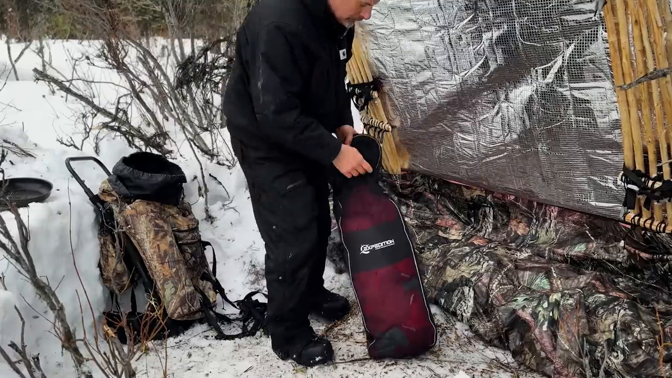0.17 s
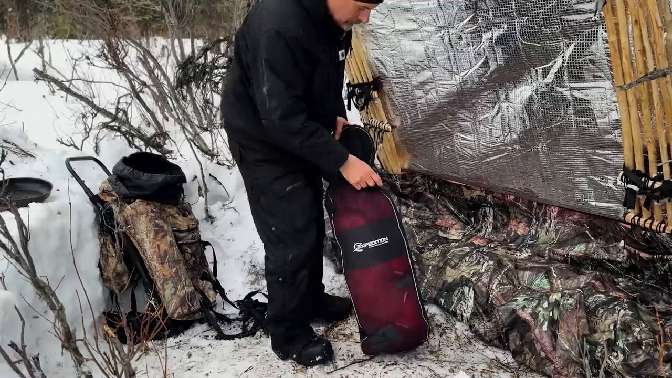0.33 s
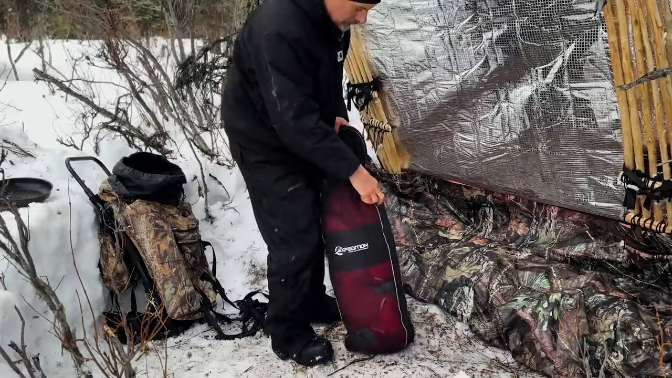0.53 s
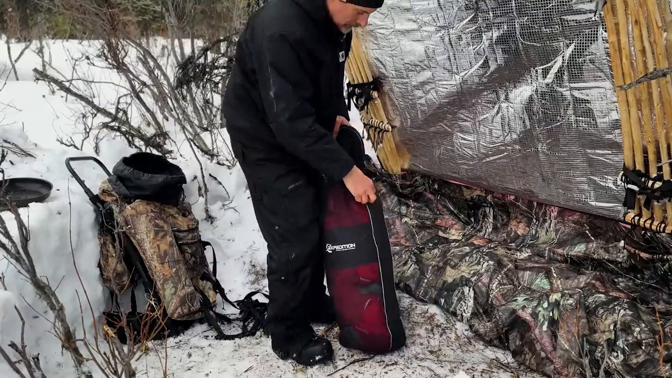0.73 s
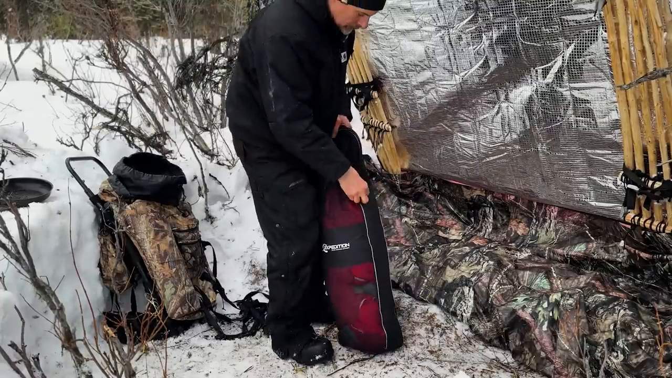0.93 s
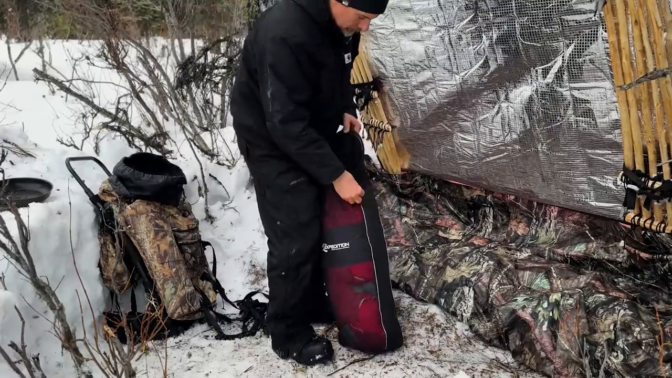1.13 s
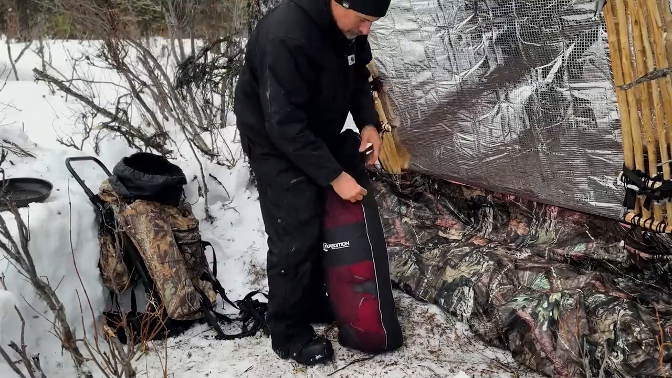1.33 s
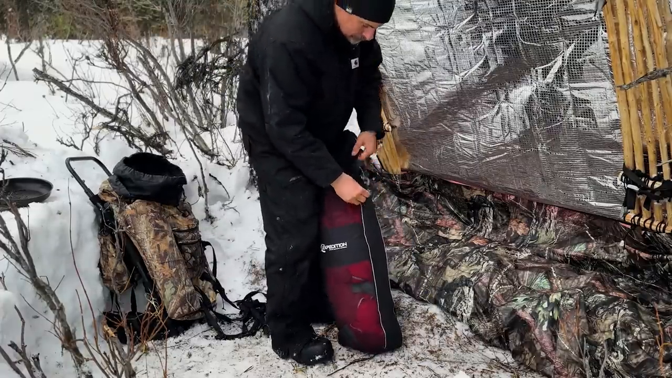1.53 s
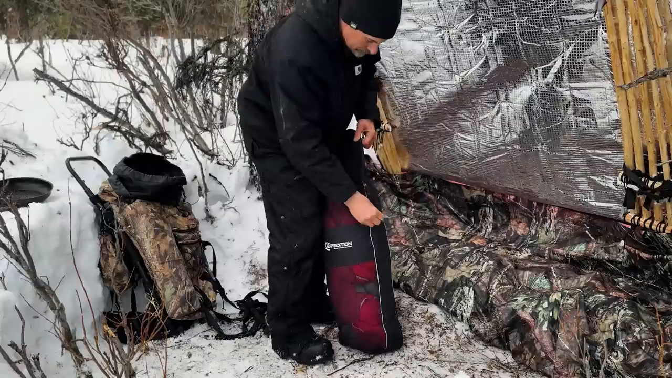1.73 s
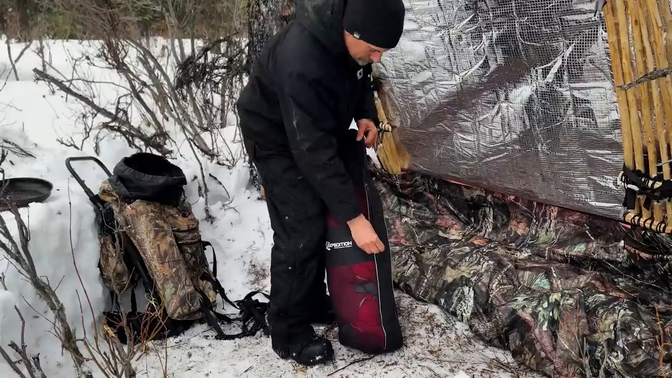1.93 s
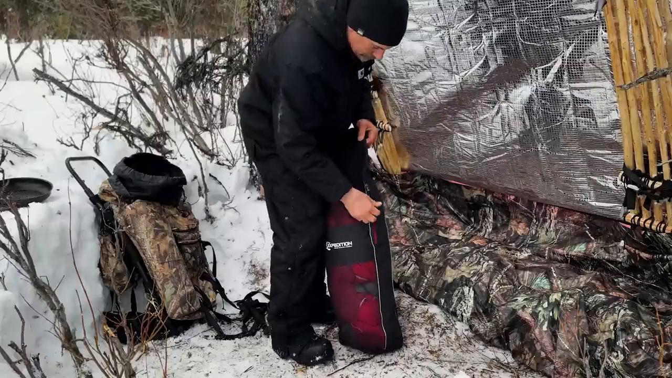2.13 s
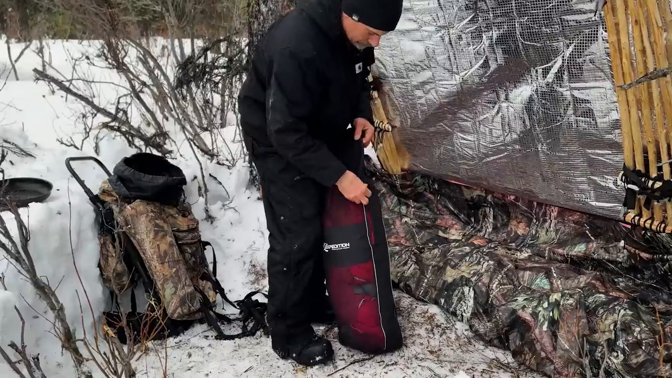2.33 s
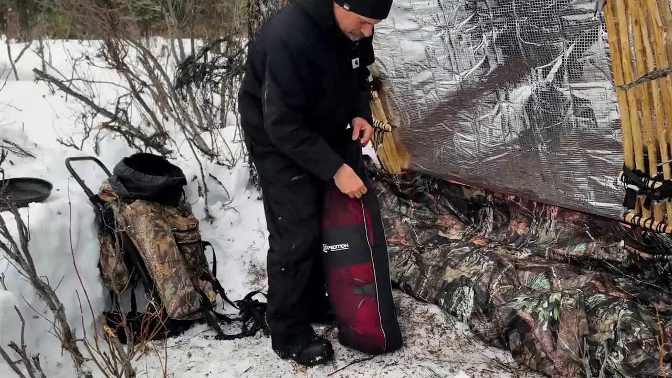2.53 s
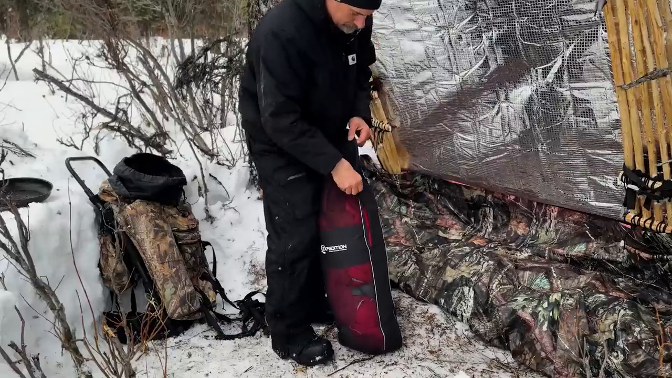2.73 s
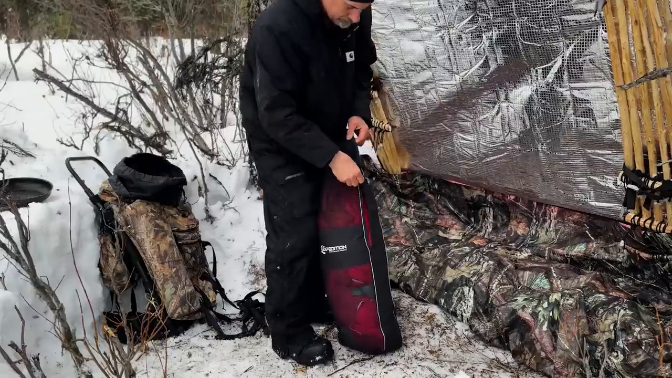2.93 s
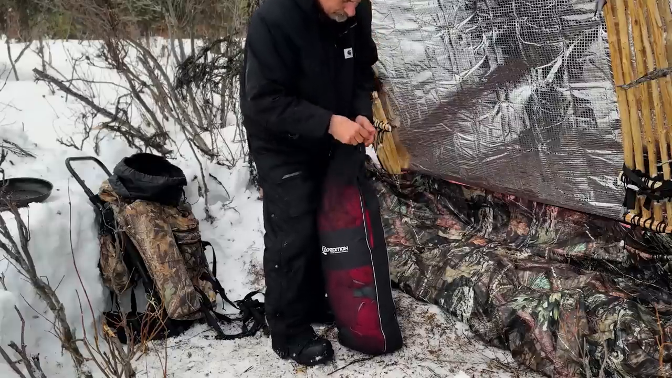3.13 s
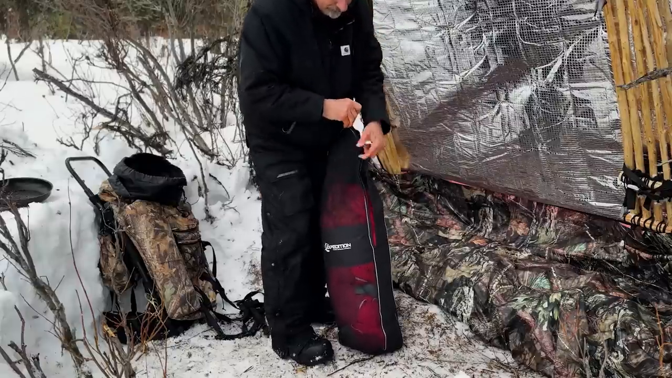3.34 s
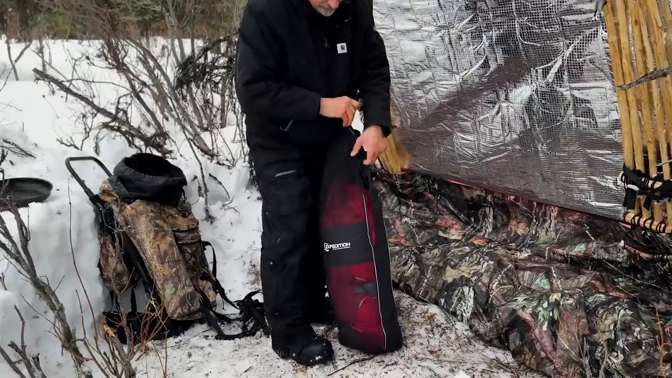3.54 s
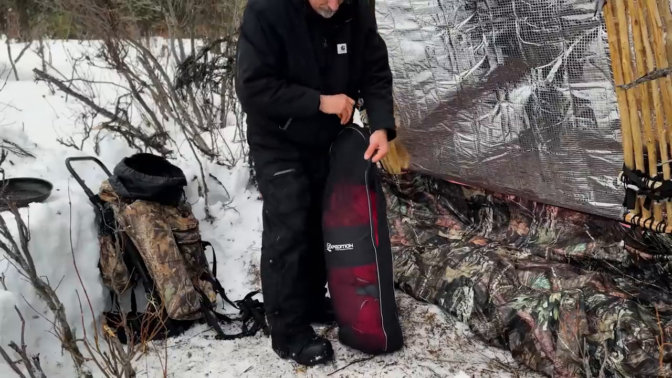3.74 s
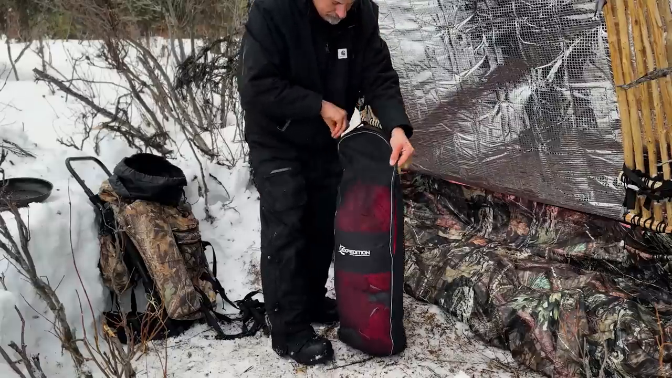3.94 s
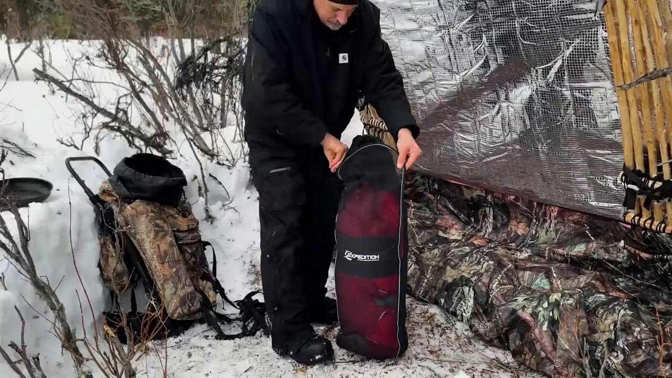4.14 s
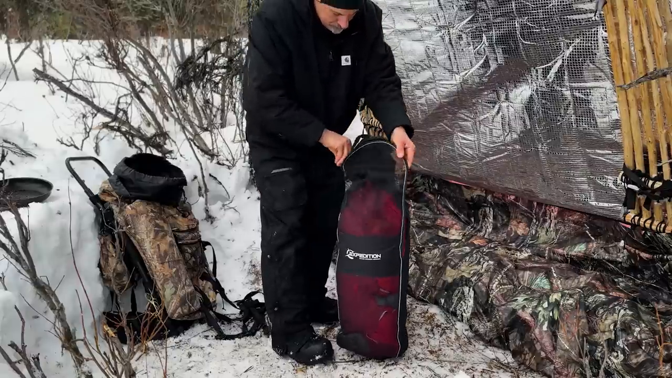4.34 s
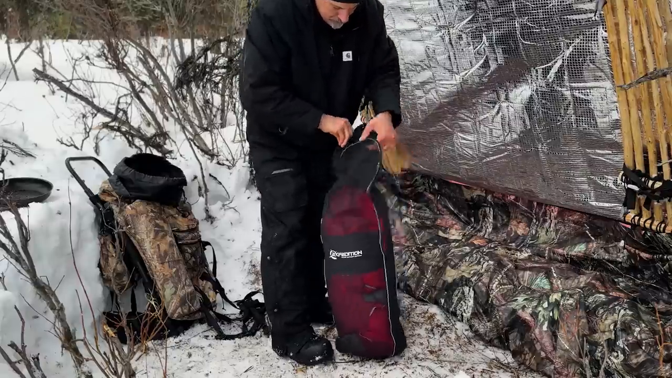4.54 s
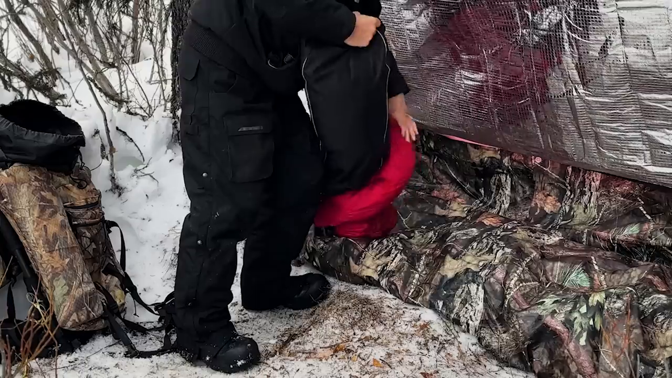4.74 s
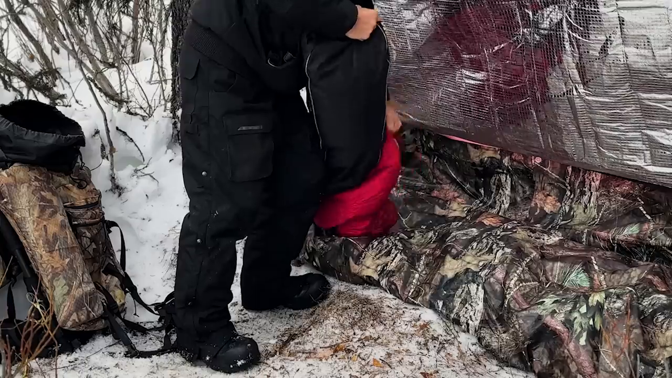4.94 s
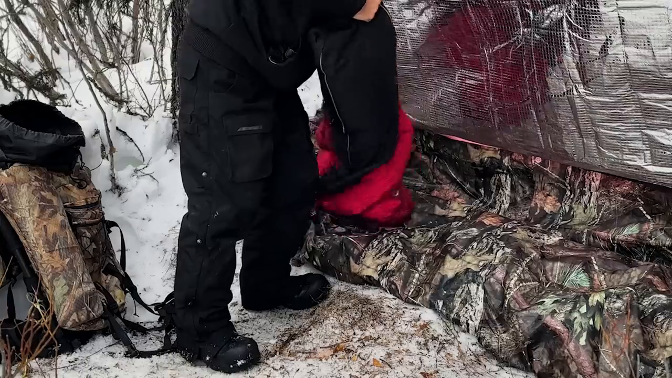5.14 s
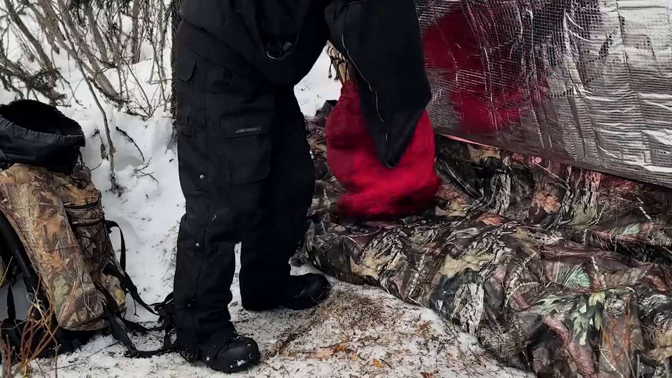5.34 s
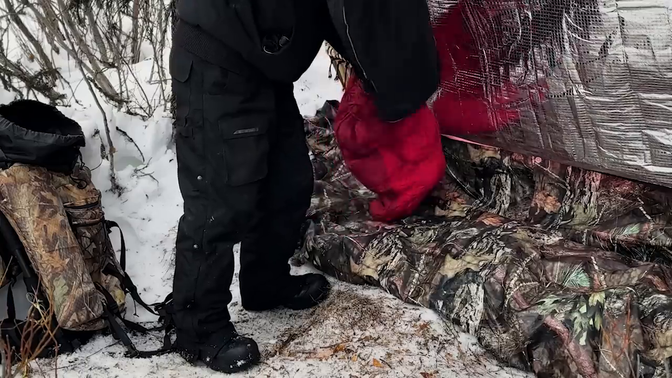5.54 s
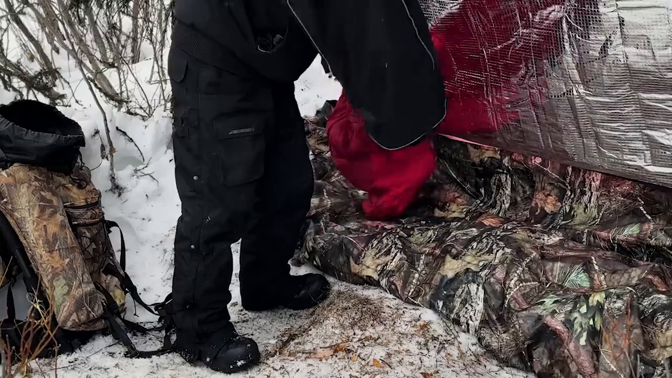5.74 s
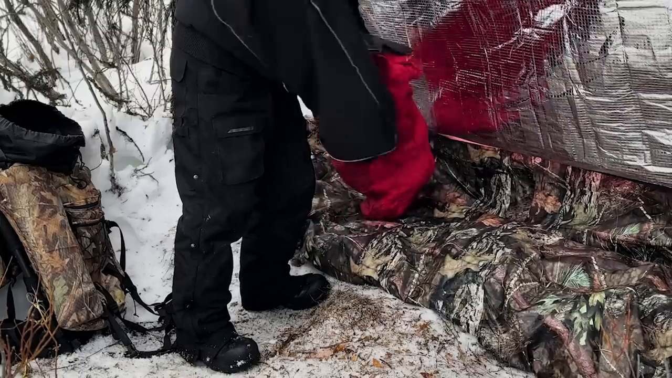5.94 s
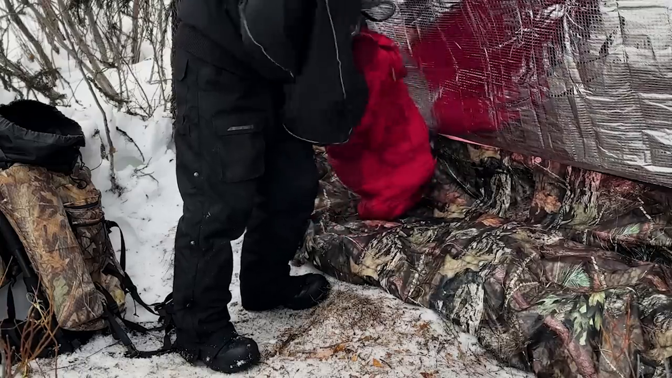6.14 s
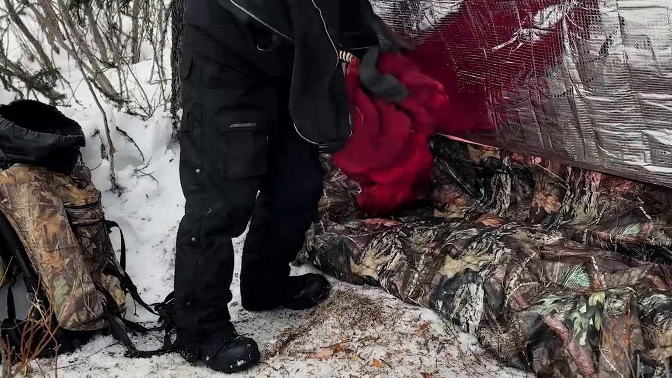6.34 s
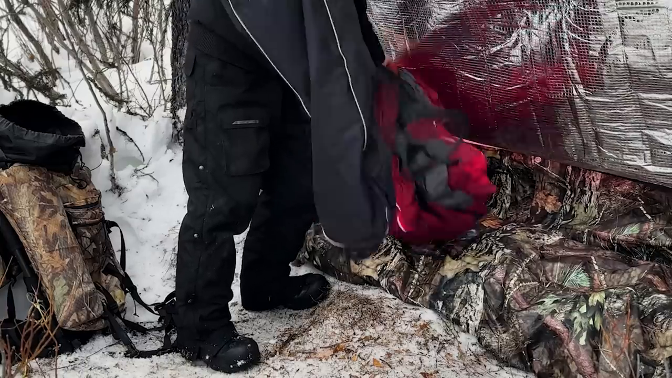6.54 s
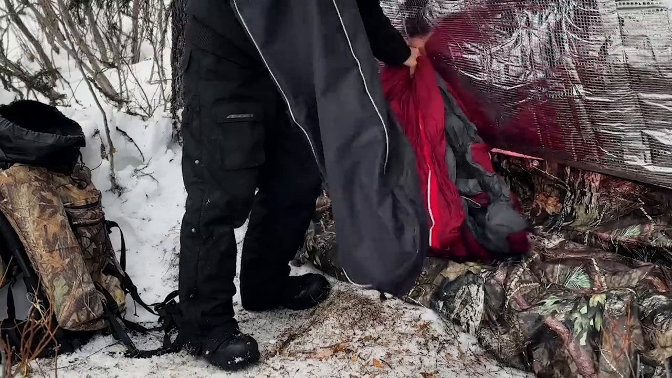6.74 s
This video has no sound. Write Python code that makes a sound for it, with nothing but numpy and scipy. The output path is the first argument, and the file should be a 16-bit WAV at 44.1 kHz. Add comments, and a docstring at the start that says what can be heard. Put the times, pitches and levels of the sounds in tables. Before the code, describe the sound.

Close-up outdoors: soft fabric rubbing, a clinking zipper tab, four short rasping zips, then louder nylon rustle, snaps and dull thumps as bedding is pulled free.

```python
"""Nylon rubs and crinkles over quiet air, a metal tab jingles and a sack knocks about; a zipper buzzes round it
in four strokes, then a sleeping bag is hauled out with harder snaps, in a snowy camp.
Cloth is friction noise in flickering bands plus ringing creases; tab, thuds and snaps are short decaying rings.
Zipper teeth are knocks that ring sack wall, tape and slider.
All is heard through two close microphone ports."""
import sys
import numpy as np
from scipy import signal
from scipy.fft import rfft, irfft, next_fast_len
from scipy.io import wavfile
from scipy.ndimage import uniform_filter1d

SR = 44100
rng = np.random.default_rng(int(sys.argv[2]) if len(sys.argv) > 2 else 0)


def master(y):
    """Save y as 16-bit WAV."""
    cut = np.clip(np.atleast_2d(y).T, -1, 1)
    pcm = np.round(cut * 32767)  # scale
    wavfile.write(sys.argv[1], SR, pcm.astype(np.int16))


N = 298726

# Levels in the tables are mix settings ahead of the overall trim in scene().
# Rubs of cloth on cloth. Each row: time of full strength, rise, hold and fall in seconds, hiss level in dB,
# then weight of the sack, body of the cloth and sheen in dB relative to the hiss.
RUBS = [(0.0, .1, 0.003, 0.081, -51.5, 0, -2.5, -4), (0.065, 0.091, 0.16, 0.11, -60, -20, 0.5, -6.5),
        (0.227, 0.032, .01, 0.09, -56, 0, -1.5, -10), (0.298, 0.017, 0.048, 0.32, -58, 5.5, 0, -10),
        (0.45, 0.11, 0.022, 0.11, -58.5, 3.5, 8.5, -7), (0.528, .05, .28, 0.045, -68.5, 7, 14, -12),
        (0.92, 0.32, 0.012, 0.1, -61.5, 1.5, 2.5, -10.5), (1.019, 0.014, 0.015, 0.039, -73, 6, 19.5, -19),
        (1.101, 0.026, 0.013, 0.44, -57.5, -10, -11.5, -17), (1.304, 0.16, 0.059, 0.49, -59, -32, -1, -6.5),
        (1.36, 0.057, 0.02, 0.35, -59, -24, 2.5, -9), (1.59, 0.27, 0.14, 0.048, -61, 4.5, -12, -19),
        (1.793, 0.26, 0.13, 0.042, -54, -18, 11.5, -16.5), (1.991, 0.061, 0.085, 0.13, -64.5, -7, -8, -13),
        (2.094, 0.022, 0.03, .1, -63.5, -13, 6.5, -17), (2.151, 0.087, 0.087, 0.1, -63, -4, 5.5, -2),
        (2.304, 0.092, 0.02, 0.049, -73, 13, 14.5, -9), (2.435, 0.16, 0.021, 0.22, -65, -4, -0.5, -19),
        (2.939, 0.09, 0.022, 0.066, -62, 2, 1.5, -9), (3.044, 0.21, 0.072, 0.23, -51.5, -28, 4, -16),
        (3.15, 0.2, 0.039, 0.19, -56.5, -13, 3, -10), (3.283, 0.15, 0.082, 0.19, -59.5, -9, -1, -7),
        (3.358, 0.05, 0.336, 0.05, -78, 14.5, 10, -18), (3.456, 0.013, 0.018, 0.022, -57, -12, -15, -16.5),
        (3.577, 0.015, 0.033, 0.099, -53.5, -15, -2, -34),
        (3.786, 0.13, 0.15, 0.084, -46, -19, -0.5, -14.5), (4.055, 0.14, 0.04, 0.12, -50.5, -13, 7, -7),
        (4.12, 0.19, 0.0033, 0.086, -59.5, 1, 19, -13), (4.304, 0.06, 0.08, 0.11, -63.5, -29, 1.5, -9),
        (4.422, 0.17, .01, 0.12, -53.5, -10, -4.5, -12), (4.528, 0.11, 0.0059, 0.082, -51, -2, 2.5, -14.5),
        (4.628, 0.0092, 0.091, 0.094, -52.5, -7.5, 0, -6), (4.844, 0.11, 0.022, 0.086, -49, -43, -1, -18),
        (5.096, 0.041, 0.045, 0.098, -56, -12, 3, -3), (5.163, 0.17, 0.082, 0.38, -50.5, -6, -1, -10),
        (5.31, 0.67, 0.049, .2, -46.5, -5.5, 3.5, -5.5), (5.422, 0.19, 0.058, 0.23, -38, -17, -4.5, -7.5),
        (5.573, 0.16, 0.024, 0.19, -36.5, -14.5, -2, -9.5),
        (5.675, 0.16, 0.029, 0.055, -43, -7.5, -1.5, -6), (5.767, 0.11, 0.019, 0.02, -66, 4, 9, -24),
        (5.942, 0.24, 0.043, 0.21, -49.5, -14, 3, -5), (5.993, 0.088, 0.018, 0.21, -54.5, -2.5, 7.5, -4),
        (6.144, 0.094, 0.049, 0.15, -52.5, -5.5, 6.5, 0.5), (6.24, 0.12, 0.024, 0.11, -51.5, -16, 7, -15),
        (6.28, 0.08, 0.029, 0.15, -41, -8.5, -1.5, -7), (6.468, 0.065, 0.01, 0.17, -57, 3, 2.5, -4),
        (6.575, 0.027, 0.014, 0.16, -39, -25, 9, -11.5), (6.597, 0.019, 0.012, 0.064, -37, -4, 8.5, -7),
        (6.661, 0.046, 0.0091, 0.8, -47.5, 4, 4, -8)]
# Floor under the rubs while the hands are nearly still. One row: weight, body, hiss and sheen in dB.
REST_DB = [-80.5, -95, -91, -103]
# Cloth held taut rubs less during a zipper stroke. One row: change of body and of hiss in dB.
HELD_DB = [-10, -4]
# Where the four cloth controls act. One row: weight, body, hiss and sheen in Hz.
CLOTH_CONTROL_HZ = [110, 700, 4700, 13500]
# Colour of the rubbing nylon. Each row: frequency in Hz, gain in dB relative to the control there.
NYLON = [(30, -28), (50, 15.5), (110, 16.5), (250, 16), (700, 8.5), (1500, 6.5), (2500, 5.5), (4700, 1),
         (7500, 8), (10500, 7.5), (13500, -32), (16000, 13.5)]
# Colour of the quiet winter air. Each row: frequency in Hz, relative gain in dB.
AIR_COLOUR = [(30, -10), (90, -1), (190, -14), (300, 1), (760, -9.5), (1200, -13.5), (3700, -8.5),
              (10000, -18), (16000, -33)]
# The metal tab touches the slider. Each row: start in seconds, level of the upper pair in dB,
# lower mode and tick in dB relative to that level.
JINGLES = [(0.0338, -43, -4, -13), (0.2114, -52, 0, -6), (0.238, -44, -6, -8), (0.4828, -41, -6.5, -5),
           (0.579, -54, 0.5, -24), (0.8057, -44, -12, -5), (1.5843, -46.5, -12, 3), (2.175, -45.5, -8, 9),
           (2.1864, -40, -9, -5), (2.2299, -42, -7, 6), (2.3101, -60, -1, 4), (5.8067, -58, -14, -11),
           (6.4488, -37, -32, -9.5), (6.555, -52, 1, 0), (6.608, -30, -3, -12)]
# Modes of the tab, a close upper pair and a lower one. Each row: frequency in Hz, 60 dB decay in seconds.
TAB_MODES = [(15680, .035), (15150, .02), (6360, .04)]
# The sack bumps the ground or a leg. Each row: start in seconds, level before the soft onset in dB, pitch in Hz.
THUDS = [(0.062, -38.5, 67.6), (0.304, -39, 118), (0.328, -31, 83.4), (0.75, -43.5, 159), (1.021, -41, 318),
         (1.028, -43, 321), (1.04, -52, 318), (1.59, -46, 139), (1.718, -52, 140), (1.931, -51, 90),
         (2.18, -55, 90), (2.312, -52, 172), (3.1, -50, 110), (2.395, -48, 245), (4.473, -41, 152),
         (4.526, -44, 93), (4.706, -44, 120), (5.138, -34, 107), (5.189, -44, 128), (5.295, -30, 135),
         (5.423, -25, 122), (6.298, -30, 356), (6.326, -37, 345), (6.383, -35, 326), (6.576, -20, 172),
         (6.609, -27.5, 226), (6.634, -28, 95)]
# Stiff cloth snaps over. Each row: start in seconds, fold level in dB, settled pitch of the fold in Hz,
# crack in dB relative to the fold level.
SNAPS = [(0.219, -48, 610, 2), (0.3008, -38.5, 450, -5.5), (0.459, -50, 950, -5), (1.0178, -49, 330, -17),
         (1.0485, -46.5, 330, -9), (1.118, -60, 280, -4), (2.004, -62, 250, 11), (2.081, -54, 1390, 9),
         (2.175, -50.5, 490, -1), (2.23, -40, 750, 0), (3.095, -47.5, 402, -12), (3.296, -46, 248, -10),
         (3.456, -57, 246, 6), (3.49, -53, 220, -10), (3.523, -59, 287, 9.5), (3.588, -59, 404, 10),
         (3.7185, -42.5, 436, -17), (4.221, -56, 430, -9), (4.516, -38, 616, -2), (4.622, -47.5, 373, -7),
         (4.704, -42, 368, 3), (4.836, -38.5, 1160, -2), (5.079, -41.5, 460, 0), (5.099, -41.5, 1210, 0),
         (5.131, -39, 1100, 3), (5.161, -41, 610, 6.5), (5.234, -33.5, 1100, -2), (5.211, -35, 580, -8),
         (5.293, -36.5, 515, 4), (5.466, -31, 650, -4), (5.68, -32, 1580, -2), (5.721, -38, 1050, 4.5),
         (5.738, -37, 685, -22.5), (5.775, -38, 860, -10), (5.8035, -40.5, 1100, -9),
         (6.131, -53, 759, -11), (6.17, -38, 720, -5), (6.498, -44.5, 1660, 1), (6.539, -39.5, 1010, -19),
         (6.737, -39, 540, 4.5), (6.449, -45.5, 412, 9), (6.555, -39.5, 960, 3), (6.59, -30, 546, 5.5),
         (6.636, -38, 600, -4)]
# Four zipper strokes; the speed jumps where the slider catches. Each row: time in seconds, teeth per second
# before tremble, level in dB, then drive of the tape by its tension and of the slider in dB relative to that.
STROKES = [
    [(1.64, 321.3, -67.5, -10, -19), (1.722, 351.4, -60, -14, -16), (1.745, 397.3, -63, -0.5, -17),
     (1.77, 465, -62.5, 1, -11), (1.8, 492.3, -62.5, -1, -12), (1.822, 513, -60, -2.5, -17),
     (1.848, 498.5, -51, -8.5, -22), (1.862, 548, -63, 0, -5), (1.876, 503, -49, -9, -21),
     (1.902, 354.3, -49.5, -14, -28), (1.93, 315, -57, -14, -19), (1.955, 267, -82, -19, -22)],
    [(2.89, 190.2, -70, -17, -18), (2.966, 359.3, -66.5, -6, -17), (2.974, 358.5, -53, -20, -24),
     (2.989, 364, -59, -22, -19), (2.995, 541.5, -65, 2.5, -4), (3.012, 546.5, -66, -4, -23),
     (3.035, 655, -64, -10, 0), (3.06, 644, -64, -8, 1), (3.1, 538.5, -66, -26, -11),
     (3.118, 673, -61, -25, -12), (3.15, 641, -63, -13, -17), (3.175, 520, -65.5, -0.5, -10),
     (3.203, 350, -68, -14, -18), (3.24, 293, -81, -14, -14)],
    [(3.75, 592, -73, -9, 8.5), (3.775, 610.5, -74.5, -6, 13), (3.795, 636, -67, 1, 6),
     (3.82, 630, -65.5, 2, -5), (3.834, 753, -64.5, 3, -4), (3.848, 698, -68, 2, -4),
     (3.864, 598, -71, 2, 1), (3.894, 610, -69.5, 5, -2), (3.914, 477.5, -66.5, 0, -10),
     (3.928, 424, -66, -3, -8), (3.945, 309, -60, -14, -15), (3.965, 260, -63, -27, -22)],
    [(4.0, 596, -72, -16, 5), (4.035, 753, -54, -27, -7), (4.075, 687, -57, -22, -12),
     (4.12, 537, -66, -12, -10), (4.19, 379, -76, -5, -25)],
]
# Roughness of each stroke at steady speed. One row: a share from 0 to 1 per stroke.
ROUGHNESS = [.18, .22, .12, .6]
# The slider rocks, so every other tooth hits harder. One row: start and end in seconds, depth from 0 to 1.
ROCKING = (3.795, 3.825, .5)
# Resonances of the sack wall. Each row: frequency in Hz, width in Hz, gain in dB.
WALL = [(370, 300, 0), (700, 300, -5)]
# Resonances of the zipper tape before flicker. Each row: frequency in Hz, width in Hz, gain in dB.
TAPE = [(1000, 500, 3), (1600, 300, 2), (1950, 400, 1.5), (2600, 500, -4)]
# The slider's own ring before flicker. Each row: frequency in Hz, width in Hz, gain in dB.
SLIDER = [(2600, 500, -3), (4000, 1000, -1)]
# The two microphone ports. Each row: frequency in Hz, likeness from 0 to 1, left lead in radians while the
# sack stands, the same once the bag is out, left minus right in dB.
PORTS = [(100, .985, 0, 0, .5), (700, .9, -.2, -.45, -1), (1500, .82, -.75, -1.3, -4.5),
         (2300, .75, .3, -.6, -2.5), (3200, .45, 1.3, -.5, -1.5), (4200, .6, .7, 0, -1.5),
         (5300, .4, 2, -1.5, -1.5), (6200, .45, .7, .2, 0), (7200, .55, 2.6, 1, 4), (7700, .25, 1, 0, 2.5),
         (8600, .65, -.7, -.6, -2.5), (9600, .8, -1.4, -1.4, 0), (11200, .98, -3.14, -3.14, 0),
         (14300, .92, -6.28, -6.28, 0), (15700, .85, -7.2, -7.2, 0)]

SWELL_DB = 20   # a rub gains this much over its rise and loses it over its fall
AIR_DB = -70   # ahead of the overall trim
THUD_T60_S = 0.052
FOLD_SAG, FOLD_SAG_S = 0.52, 0.0011   # a fold starts this share sharp; time constant of its sinking
ROUGH_PER_JERK_S = .016   # roughness for each unit of log speed gained or lost in a second
FLICKER_DB = 2.5   # spread of the coming and going of tape and slider resonances
BAG_OUT_S = 4.615   # from here the sound comes from another place
CUTOFF_HZ = 16050


def amp(db):
    """Gain of a level in dB."""
    return 10 ** (np.asarray(db) / 20)


def rms_one(x):
    """Scales a signal to rms 1."""
    return x / np.sqrt(np.mean(x ** 2) + 1e-20)


def in_time(rows):
    """Draws each column after the time as a curve, one value a sample."""
    s, *columns = np.transpose(rows)
    return [np.interp(np.arange(N) / SR, s, column) for column in columns]


def sounding(rows, fade_s=0.0046):
    """1 between the first and last row, with short fades inside."""
    t = np.arange(N) / SR
    from_edge = np.minimum(t - rows[0][0], rows[-1][0] - t)
    return np.clip(from_edge / fade_s, 0, 1)


def drift(rate_hz):
    """Slow chance of spread 1: noise twice through a one-pole low-pass, made at every 20th sample."""
    r = np.exp(-2 * np.pi * rate_hz * 20 / SR)
    noise = rng.standard_normal(N // 20 + 2002)
    slow = signal.lfilter([1], [1, -2 * r, r * r], noise)[2000:]   # skip the filter's start
    return np.interp(np.arange(N) / 20, np.arange(len(slow)), rms_one(slow))


def resonate(x, hz, width_hz):
    """Two-pole resonance, gain about 1 on top."""
    r = np.exp(-np.pi * width_hz / SR)
    top = np.array([1, 0, -1]) * (1 - r * r) / 2
    return signal.lfilter(top, [1, -2 * r * np.cos(2 * np.pi * hz / SR), r * r], x + 1e-18)


def body(x, modes):
    """Resonances side by side, signs alternating."""
    return sum((-1) ** k * amp(db) * resonate(x, hz, width) for k, (hz, width, db) in enumerate(modes))


def ring(hz, t60, length):
    """A sine that starts at height 1 and decays by 60 dB in t60 seconds."""
    t = np.arange(length) / SR
    return np.sin(2 * np.pi * hz * t) * amp(-60 * t / t60)


def add(track, s, sound):
    """Mixes a short sound in at time s."""
    i = round(s * SR)
    track[i:i + len(sound)] += sound[:N - i]


def bands(colour, excite, patchy_db, patch_hz):
    """Yields half-octave noise bands with flickering gain; neighbours get unrelated draws."""
    edges = 30 * 2 ** np.arange(0, 9.6, .5)
    hz, db = np.transpose(colour)
    for k, (low, high) in enumerate(zip(edges, np.minimum(edges[1:], 19000))):
        centre_hz = np.sqrt(low * high)
        colour_db = np.interp(np.log(centre_hz), np.log(hz), db)
        gain = amp(colour_db + patchy_db * drift(patch_hz))
        band_pass = signal.butter(2, [low, high], "band", fs=SR, output="sos")
        yield centre_hz, gain * signal.sosfilt(band_pass, excite[k % 2])


def cloth_controls():
    """Weight, body, hiss and sheen in dB: the rubs swell, hold and fade, adding in power."""
    t, power = np.arange(0, N + 32, 32) / SR, 0
    for s, rise, hold, fall, hiss_db, weight_db, body_db, sheen_db in RUBS:
        faded = np.maximum(np.maximum((s - t) / rise, (t - s - hold) / fall), 0)
        balance_db = np.array([[weight_db], [body_db], [0], [sheen_db]])
        power = power + amp(hiss_db - SWELL_DB * faded + balance_db) ** 2
    levels = 10 * np.log10(power + amp(REST_DB)[:, None] ** 2)
    controls = np.array([np.interp(np.arange(N) / SR, t, row) for row in levels])
    held = sum(sounding(rows, 0.027) for rows in STROKES)
    controls[1:3] += np.array(HELD_DB)[:, None] * held
    return controls


def crinkles(per_s, spread_db, decay_s):
    """Creases let go at random: sudden bursts of uneven size that die fast, in clumps."""
    born = rng.random(N) < per_s * amp(5 * drift(9)) / SR
    sizes = amp(spread_db * np.minimum(rng.exponential(1, N), 4))
    return signal.lfilter([1], [1, -np.exp(-1 / (decay_s * SR))], born * sizes)


def cloth(controls):
    """Friction noise, gated by crinkles and slips; two unrelated patches of cloth share every movement."""
    slips = amp(1.52 * drift(6.7)) * (1 + 0.1 * crinkles(250, 2.45, 0.0038))
    excite = rng.standard_normal((2, 2, N)) * rms_one(slips)
    out = 0
    for hz, band in bands(NYLON, excite, patchy_db=1.5, patch_hz=8.9):
        # each band follows the nearest controls
        share = [np.interp(np.log(hz), np.log(CLOTH_CONTROL_HZ), row) for row in np.eye(4)]
        out = out + band * amp(share @ controls)
    return out


def creases(body_db, hiss_db, per_s):
    """Single creases pop and ring over five octaves; low ones follow the body, high ones the hiss."""
    born = rng.random(N) < per_s * amp(4 * drift(12)) / SR
    sizes = amp(4.0 * np.minimum(rng.exponential(1, N), 3))
    pops = born * sizes * rng.choice([-1, 1], N)
    dealt, out = rng.integers(0, 18, N), 0   # each pop gets one of 18 pitches
    for k, hz in enumerate(np.geomspace(250, 9000, 18)):
        high = k / 17
        level_db = (1 - high) * (body_db - 21.5) + high * (hiss_db - 24.0)
        rung = resonate(pops * (dealt == k), hz, 0.35 * hz)
        out = out + rms_one(rung) * amp(level_db)
    return out


def air():
    """The steady hush of the place: coloured noise whose bands flicker gently."""
    parts = bands(AIR_COLOUR, rng.standard_normal((2, 2, N)), patchy_db=1.2, patch_hz=6)
    return amp(AIR_DB) * rms_one(sum(band for hz, band in parts))


def tab():
    """Each touch of metal: one sharp tick and three high modes."""
    out = np.zeros(N)
    tick = -signal.windows.hann(11) + .4 * signal.windows.hann(25)[7:18]
    tick = tick / np.abs(tick).max()
    first, second, lower = [ring(*mode, length=4000) for mode in TAB_MODES]
    for s, db, lower_db, tick_db in JINGLES:
        add(out, s, amp(db) * (first + .6 * second) + amp(db + lower_db) * lower)
        add(out, s, amp(db + tick_db) * tick)
    return out


def thuds():
    """A soft low push: a few cycles that swell and die."""
    out, t = np.zeros(N), np.arange(8000) / SR
    swell = 1 - np.exp(-t / .004)
    for s, db, hz in THUDS:
        add(out, s, amp(db) * ring(hz, THUD_T60_S, length=8000) * swell)
    return out


def snaps():
    """The fold rings a few cycles at once, sinking in pitch; a bright crack of noise rides on top."""
    out, t = np.zeros(N), np.arange(2000) / SR
    bent = t + FOLD_SAG * FOLD_SAG_S * (1 - np.exp(-t / FOLD_SAG_S))   # time runs fast at first
    crack_shape = amp(-60 * t / 0.022) * (1 - np.exp(-t / 0.00054))
    for (s, db, hz, crack_db), noise in zip(SNAPS, rng.standard_normal((len(SNAPS), 2000))):
        fold = np.sin(2 * np.pi * hz * bent) + 0.22 * np.sin(2 * np.pi * 1.83 * hz * bent)
        fold = fold * amp(-60 * t * hz / 11.7)   # 60 dB down after 11.7 cycles of the settled pitch
        crack = resonate(noise * crack_shape, 1240, 1070)
        add(out, s, amp(db) * fold + amp(db + crack_db) * crack / np.abs(crack).max())
    return out


def zipper():
    """Uneven tooth knocks ring wall, tape and slider; jerks of the hand roughen them and grit scrapes at each."""
    on_wall, on_tape, on_slider = np.zeros((3, N))
    tremble = drift(100)
    rocking = ROCKING[2] * sounding([ROCKING[:1], ROCKING[1:]])
    for rows, steady in zip(STROKES, ROUGHNESS):
        hz, level_db, tension_db, slider_db = in_time(rows)
        jerk = uniform_filter1d(np.abs(np.gradient(np.log(hz))) * SR, size=441)
        rough = np.minimum(steady + ROUGH_PER_JERK_S * jerk, .7)
        teeth = np.floor(np.cumsum(hz * (1 + .1 * rough * tremble)) / SR)   # teeth passed so far
        tooth = np.diff(teeth, prepend=0) * amp(5 * rough * rng.standard_normal(N))
        tooth = tooth * (1 + rocking * (-1) ** teeth)
        grit = signal.lfilter([1], [1, -.93], tooth) * rng.standard_normal(N) * .12 * rough
        # slower teeth knock harder, which evens out the level across speeds
        knocks = (tooth + grit) * SR / hz * amp(level_db) * sounding(rows)
        on_wall += knocks
        on_tape += knocks * amp(tension_db)
        on_slider += knocks * amp(slider_db)
    tape = 0
    for k, mode in enumerate(TAPE):
        flexed = on_tape * amp(FLICKER_DB * drift(16))   # each resonance comes and goes as the cloth flexes
        tape = tape + (-1) ** k * body(flexed, [mode])
    soft_teeth = signal.butter(2, 3300, fs=SR, output="sos")   # soft teeth give little treble
    soft = signal.sosfilt(soft_teeth, body(on_wall, WALL) + tape)
    return soft + body(on_slider * amp(FLICKER_DB * drift(23)), SLIDER)


def ports(centre, spread, later):
    """Two close ports: the spread part enters with opposite signs; phase and level differ by frequency."""
    size = next_fast_len(N + 4096)
    f = np.arange(size // 2 + 1) * SR / size
    hz, *columns = np.transpose(PORTS)
    alike, lead_first, lead_later, balance_db = [np.interp(f, hz, column) for column in columns]
    lead = lead_later if later else lead_first
    side = np.array([[1], [-1]])   # left, right
    shared = np.sqrt((1 + alike) / 2) * rfft(centre, size)
    opposed = side * np.sqrt((1 - alike) / 2) * rfft(spread, size)
    turn = amp(side * balance_db / 2) * np.exp(.5j * side * lead)
    return irfft((shared + opposed) * turn, size)[:, :N]


def scene():
    """Wide sources come as two unrelated draws; small ones reach the spread part as a late, weaker copy."""
    controls = cloth_controls()
    wide = cloth(controls) + air()
    small = creases(*controls[1:3], per_s=300) + tab() + thuds() + snaps() + zipper()
    late = np.concatenate([np.zeros(90), small[:-90]])   # 90 samples, about 2 ms
    centre, spread = wide[0] + small, wide[1] + late * 0.87
    moved = np.clip((np.arange(N) / SR - BAG_OUT_S) / .01, 0, 1)
    standing = ports(centre * (1 - moved), spread * (1 - moved), later=False)
    bag_out = ports(centre * moved, spread * moved, later=True)
    return amp(-0.5) * (standing + bag_out)   # overall trim


def record(dry):
    """The lowest bass is rolled off, the top is cut steeply."""
    low_cut = signal.sosfilt(signal.butter(2, 35, "high", fs=SR, output="sos"), dry)
    return signal.sosfilt(signal.cheby2(20, 60, CUTOFF_HZ, fs=SR, output="sos"), low_cut)


dry = scene()
out = record(dry)
master(out)
```